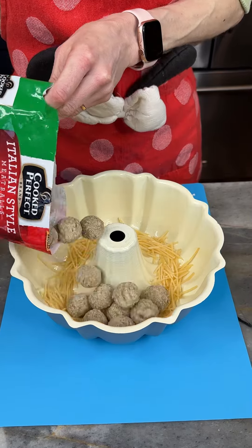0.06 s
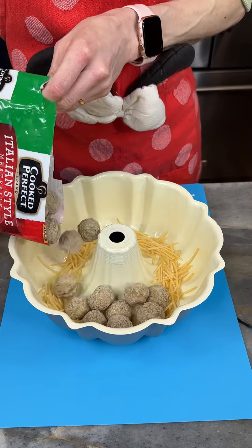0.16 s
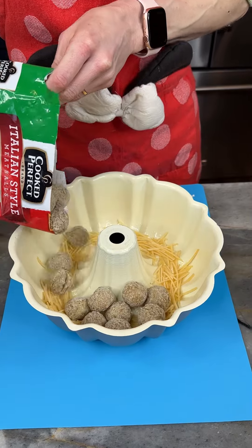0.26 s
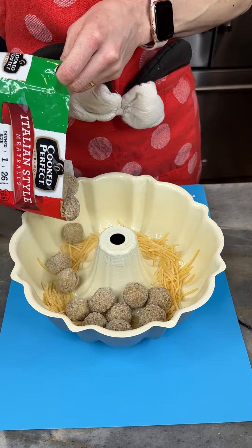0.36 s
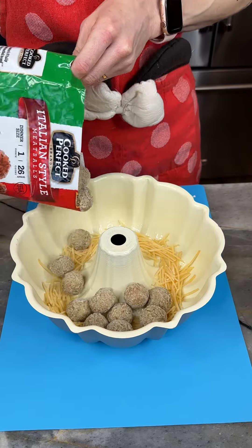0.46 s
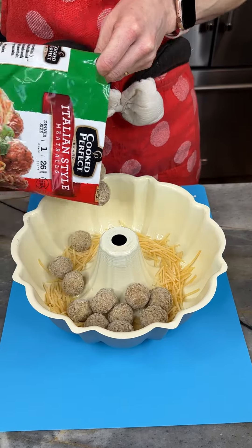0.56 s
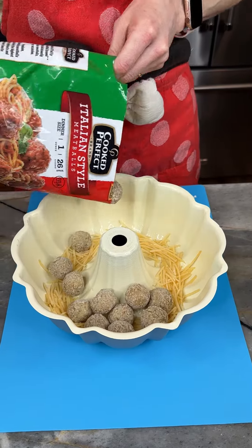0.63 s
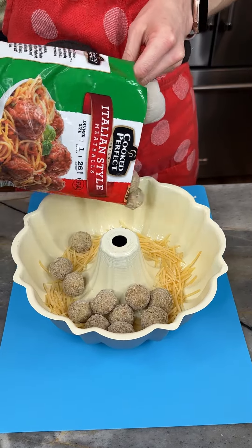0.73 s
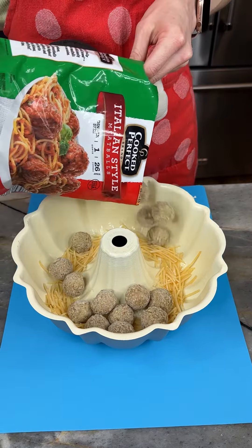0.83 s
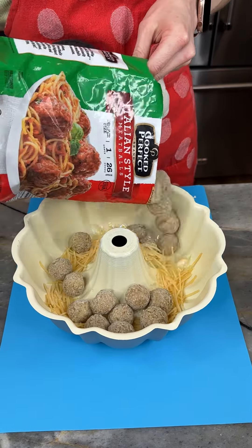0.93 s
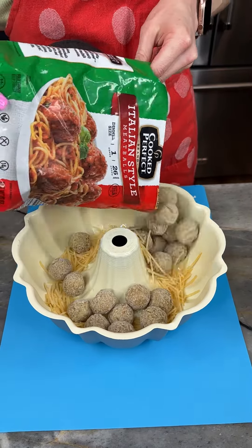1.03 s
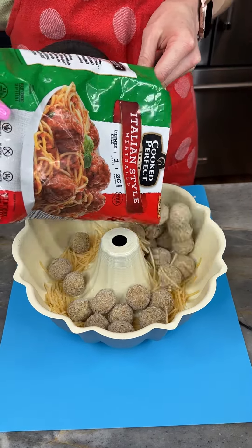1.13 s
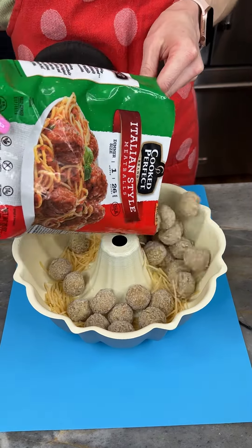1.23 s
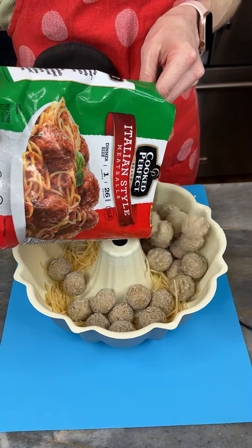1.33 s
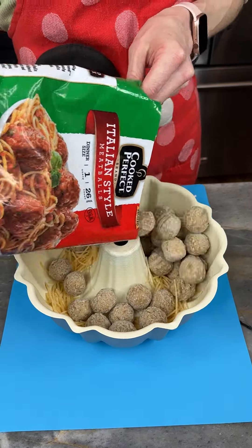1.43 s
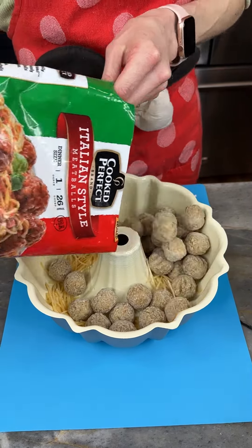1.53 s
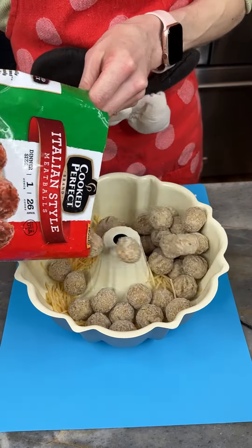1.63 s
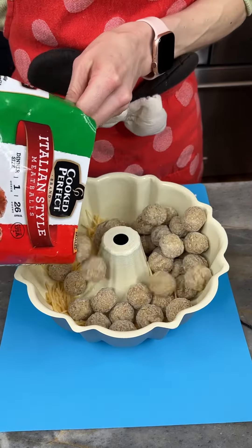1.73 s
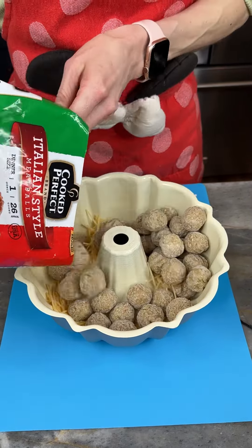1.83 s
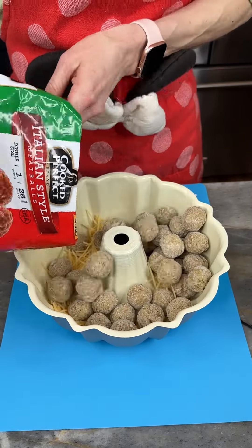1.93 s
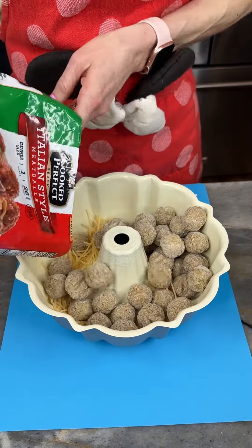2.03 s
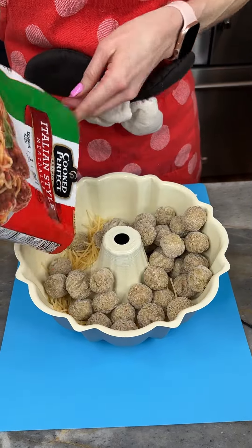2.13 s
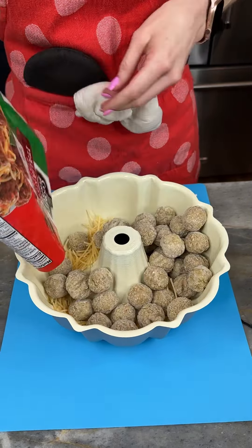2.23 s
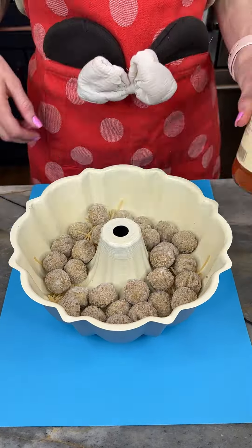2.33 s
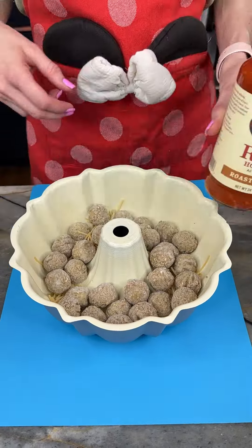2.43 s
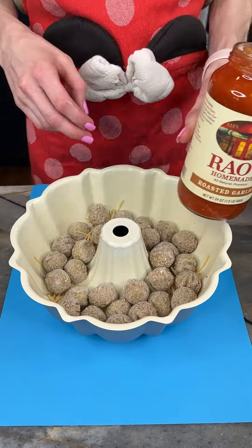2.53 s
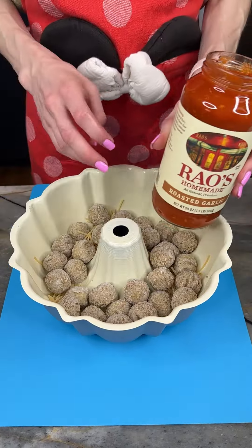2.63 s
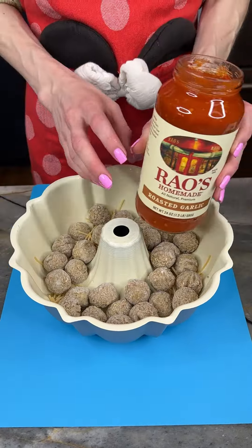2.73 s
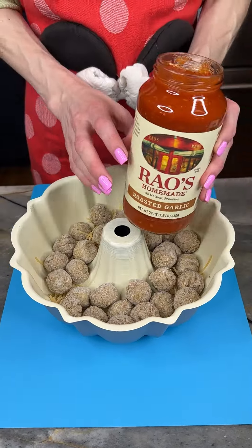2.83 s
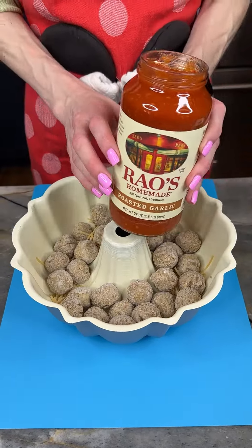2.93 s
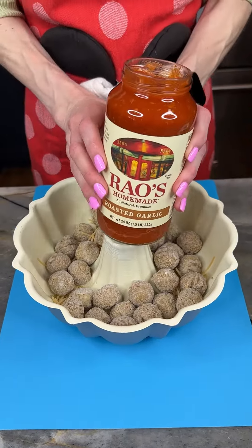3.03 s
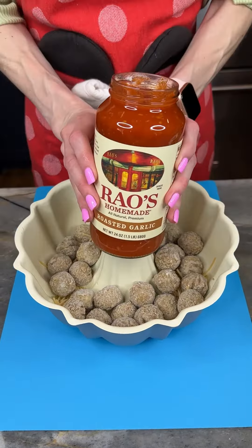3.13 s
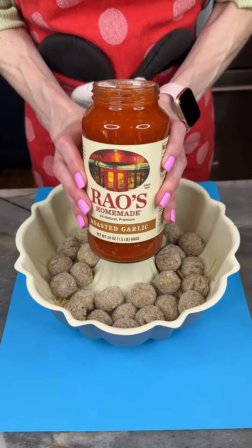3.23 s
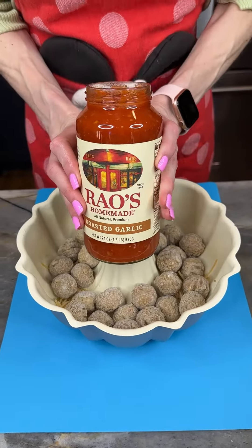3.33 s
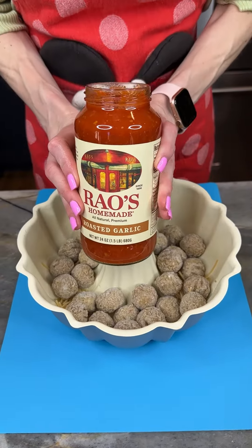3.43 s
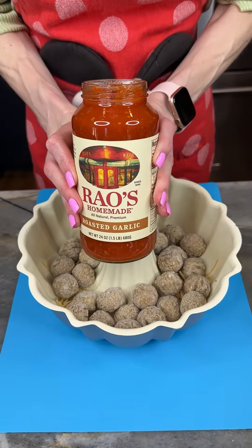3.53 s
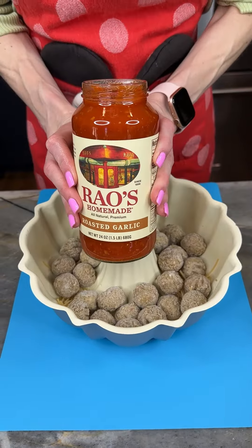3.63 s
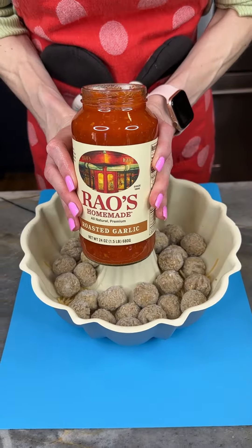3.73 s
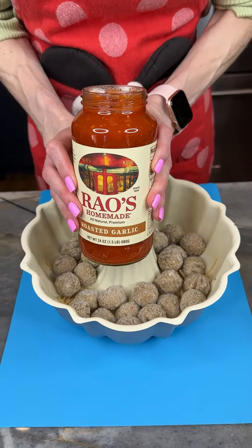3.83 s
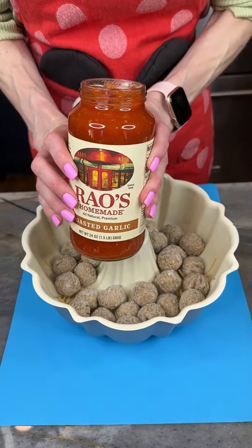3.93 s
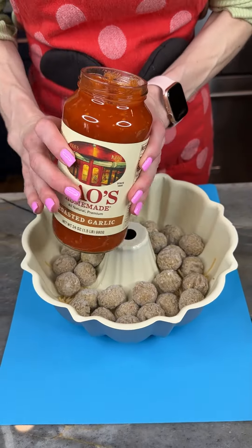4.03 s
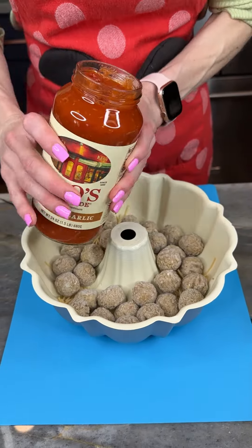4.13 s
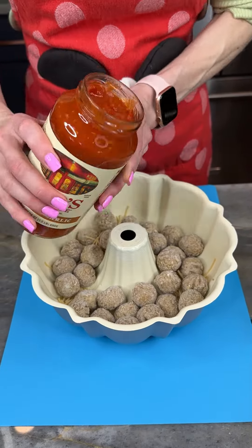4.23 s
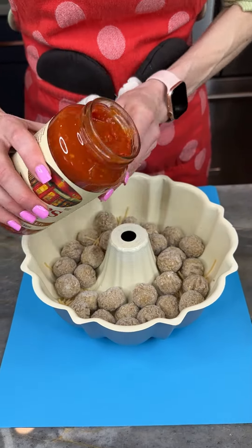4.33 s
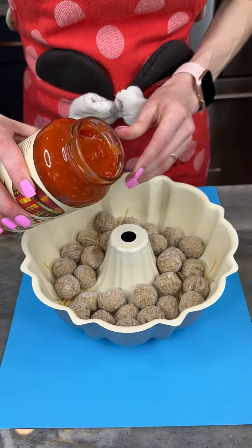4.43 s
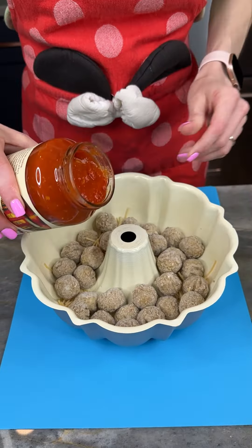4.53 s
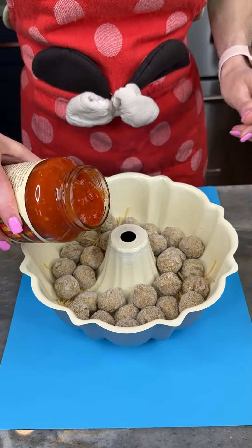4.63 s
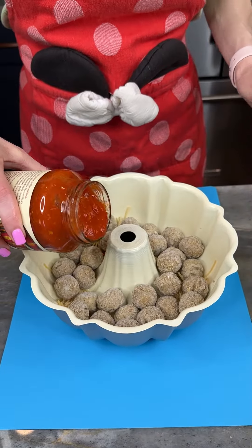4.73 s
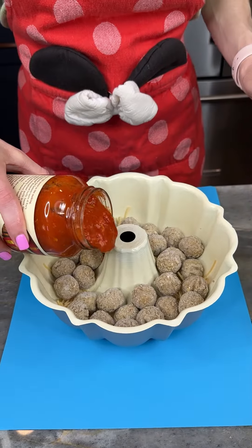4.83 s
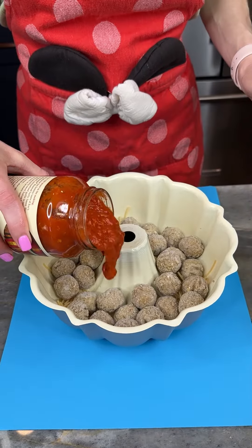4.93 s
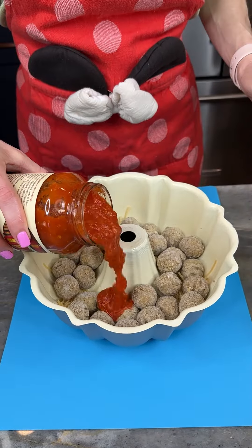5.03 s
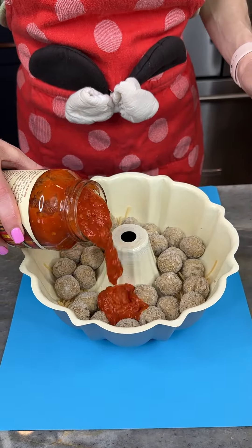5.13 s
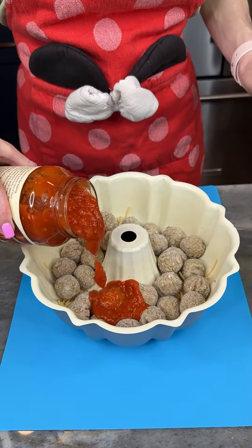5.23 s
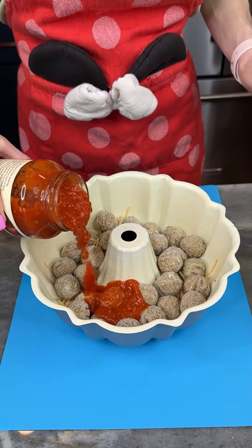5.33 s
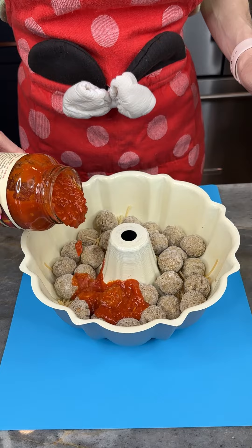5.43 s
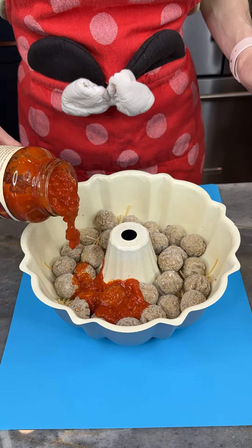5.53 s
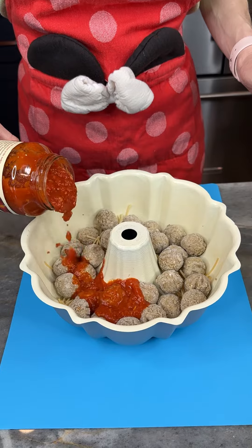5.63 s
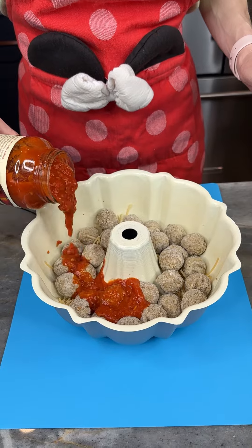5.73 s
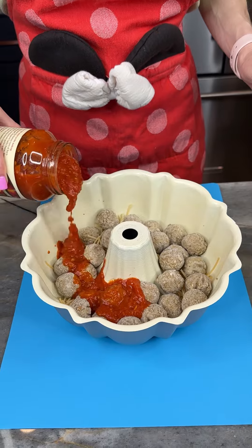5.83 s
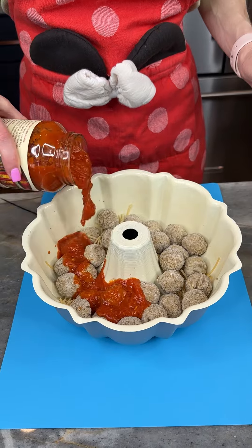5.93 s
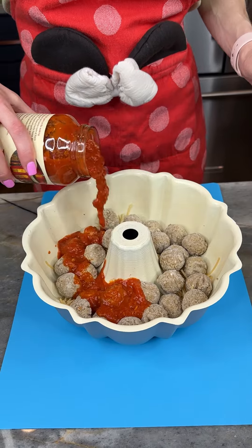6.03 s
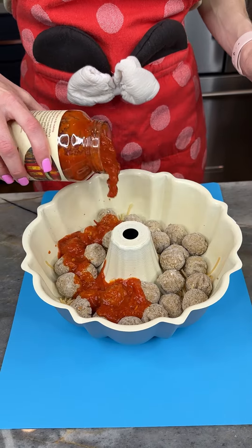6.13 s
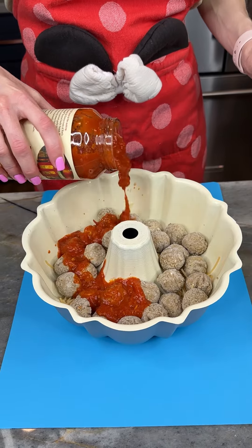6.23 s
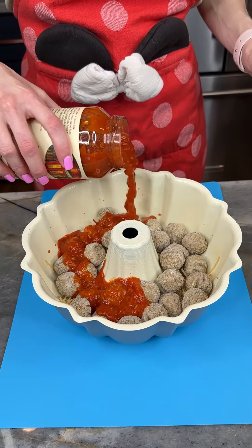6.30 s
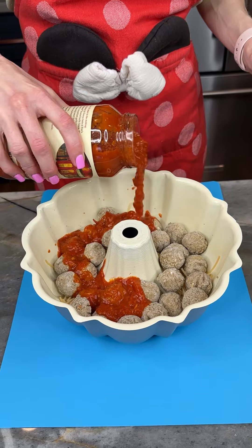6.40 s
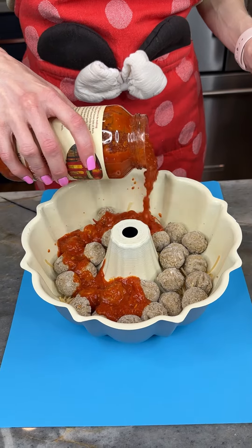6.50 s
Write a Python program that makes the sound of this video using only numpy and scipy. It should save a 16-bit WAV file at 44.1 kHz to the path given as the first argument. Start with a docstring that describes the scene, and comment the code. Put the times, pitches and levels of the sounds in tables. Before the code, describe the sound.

Frozen meatballs clatter from a crackling plastic bag into a ringing pan, then a glass jar clacks and thick sauce plops in a humming kitchen.

```python
"""A kitchen with a refrigerator humming, heard close up through a pair of microphone ports.
Frozen meatballs tumble from a crackling plastic bag: noisy knocks set a fluted pan and its counter ringing.
The level sinks, near sounds stop briefly, a dull tap follows; cloth stirs as faint swells of noise.
A glass jar bumps the pan with clacks and ringing modes, then thick sauce plops down as short rings
with wet ticks, and late among the plops a fine spatter of tiny clicks sets in."""
import sys
import numpy as np
from scipy import signal
from scipy.fft import rfft, irfft
from scipy.io import wavfile

SR = 44100
rng = np.random.default_rng(int(sys.argv[2]) if len(sys.argv) > 2 else 0)


def digitize_waveform(pressure):
    """Quantize a signal to 16-bit integers and store it at the path in sys.argv[1].

    Rows of a 2-D input are taken as channels; values are limited to [-1, 1].
    """
    field = np.atleast_2d(pressure).T
    bounded = np.clip(field, -1, 1)
    quanta = np.round(bounded * 32767).astype(np.int16)
    wavfile.write(sys.argv[1], SR, quanta)


N = 289376


def from_db(db):
    """Amplitude factor of a level in dB."""
    return 10 ** (np.asarray(db) / 20)


def rms_one(x):
    """Scale to an rms of 1."""
    return x / np.sqrt(np.mean(x ** 2) + 1e-20)


def in_time(rows):
    """Level columns at every sample; silent outside the table."""
    s, *columns = np.transpose(rows)
    return [np.interp(np.arange(N) / SR, s, c, left=-150, right=-150) for c in columns]


def at_hz(points, hz):
    """Read a curve of (hz, value) points along a logarithmic pitch axis."""
    point_hz, values = np.array(points).T[:2]
    return np.interp(np.log(hz), np.log(point_hz), values)


def drift(rate_hz):
    """Slow random wander of spread 1: noise through a double low-pass, made at one point per 40 samples."""
    r = np.exp(-80 * np.pi * rate_hz / SR)
    noise = rng.standard_normal(N // 40 + 2002)
    slow = signal.lfilter([1], [1, -2 * r, r * r], noise)[2000:]   # drop the filter's start
    return np.interp(np.arange(N) / 40, np.arange(len(slow)), rms_one(slow))


def above(x, hz):
    """Keep what lies above a pitch."""
    return signal.sosfilt(signal.butter(4, hz, "high", fs=SR, output="sos"), x)


def band_pass(low, high):
    """Filter sections that pass the band between two pitches."""
    return signal.butter(2, [low, high], "band", fs=SR, output="sos")


def ring(clicks, hz, t60):
    """A struck mode: a unit click sets off a sine of height 1 that dies by 60 dB in t60 seconds."""
    r = from_db(-60 / (t60 * SR))
    w = 2 * np.pi * min(hz, .45 * SR) / SR
    return signal.lfilter([0, np.sin(w)], [1, -2 * r * np.cos(w), r * r], clicks + 1e-18, axis=-1)


def dying(count, t60):
    """White noise that rises quickly and fades by 60 dB in t60 seconds."""
    t = np.arange(count) / SR
    return rng.standard_normal(count) * np.minimum(t / (0.13 * t60), 1) * from_db(-60 * t / t60)


def burst(count, hz, cycles, rough):
    """A tick: a dying ring around a pitch, partly broken into noise; peak 1."""
    t60 = max(cycles, 1) / hz
    kick = rough * rng.standard_normal(count) * from_db(-60 * np.arange(count) / SR / t60)
    kick[0] += 1
    ringing = ring(ring(kick, hz, t60), hz, t60 / 2)
    tick = np.diff(ringing, prepend=0)
    return tick / np.abs(tick).max()


def grains(per_s, spread_db):
    """Random clicks of uneven size and either sign; rms 1."""
    sizes = from_db(spread_db * np.minimum(rng.exponential(1, N), 5)) * rng.choice([-1, 1], N)
    return rms_one(sizes * (rng.random(N) < per_s / SR))


def coloured(sources, spectrum, likeness, patchy_db):
    """Half-octave bands of two (mid, side) sources taken in turn, each flickering on its own; rms 1."""
    out, edges = 0, 22 * 2 ** np.arange(0, 10, .5)
    for k, (low, high) in enumerate(zip(edges, edges[1:])):
        hz = np.sqrt(low * high)
        if hz < spectrum[0][0]:
            continue
        mid, side = signal.sosfilt(band_pass(low, high), sources[k % 2])
        alike = np.clip(at_hz(likeness, hz), -1, 1)   # 1: both sides the same, -1: opposite
        gain = from_db(at_hz(spectrum, hz) + patchy_db * drift(49))
        out = out + gain * (np.sqrt(1 + alike) * mid + np.sqrt(1 - alike) * side * [[1], [-1]])
    return rms_one(out)


def sides(left_db):
    """Left and right factors for a left-over-right level difference."""
    return from_db(np.array([left_db, -left_db]) / 2)


def add(out, s, sound):
    """Mix a (channels, samples) sound in at a time in seconds."""
    at = round(s * SR)
    out[:, at:at + sound.shape[1]] += sound[:, :N - at]


def fridge():
    """Two motor hums slightly apart beat slowly; steadier tones lie above, over the rumble of room air."""
    # steady tones: hz, level_db (rms, before a slow wander)
    hum = [(234, -65), (361, -76.5), (605, -83)]
    # relative spectrum of the room air: hz, level_db (per Hz)
    air_colour = [(20, -21.5), (38, -9), (60, -3), (90, -1.5), (140, -6), (200, -5.5), (300, -11.5),
                  (450, -13), (620, -20), (800, -30), (2000, -36.5), (5000, -42), (8500, -39), (11000, -57),
                  (16000, -65)]
    # left-right likeness of the room air: hz, likeness (-1 to 1)
    air_likeness = [(60, 1), (180, 0.72), (550, -0.2), (1650, 0.98), (5000, .3), (15000, -.5)]
    beat_hz, beat_per_s, dip_s = 119.4, 1.9, 2.96   # near dip_s the two hums partly cancel
    lower_db, upper_over_lower_db, air_db = -63, 2.5, -62   # rms
    t = np.arange(N) / SR - dip_s
    lower = np.sin(2 * np.pi * beat_hz * t)
    upper = np.sin(2 * np.pi * (beat_hz + beat_per_s) * t + 0.14 * drift(.8))
    tones = from_db(lower_db) * (lower - from_db(upper_over_lower_db) * upper)
    for tone_hz, level_db in hum:
        level = from_db(level_db + 1.5 * drift(4.2))
        tones = tones + level * np.sin(2 * np.pi * tone_hz * t + .4 * drift(0.75))
    air = coloured(rng.standard_normal((2, 2, N)), air_colour, air_likeness, patchy_db=-0.2)
    return np.sqrt(2) * tones + from_db(air_db) * air   # sqrt(2) turns sine height into rms


def kitchen(x):
    """Dense echoes from hard walls: noise that swells in quickly and dies band by band; two answers."""
    # decay of the nearer echoes: hz, t60_s
    kitchen_t60 = [(400, 0.75), (1000, 0.33), (2500, 0.21), (6000, 0.17), (12000, 0.26)]
    swell_s = 0.0081
    late_db, late_slower = -10.5, 1.7   # a weaker, slower tail from the far end of the room
    t = np.arange(round(.8 * SR)) / SR
    answer, edges = 0, 300 * 2 ** np.arange(0, 6.5)
    for low, high in zip(edges, edges[1:]):
        band = signal.sosfilt(band_pass(low, high), rng.standard_normal((2, len(t))))
        fall_db = -60 * t / at_hz(kitchen_t60, np.sqrt(low * high))
        answer = answer + band * (from_db(fall_db) + from_db(late_db + fall_db / late_slower))
    answer = answer * np.clip(t / swell_s, 0, 1) ** 2
    answer = answer / np.sqrt(np.sum(answer ** 2, 1, keepdims=True))   # unit energy
    return signal.fftconvolve(x[None], answer, axes=1)[:, :N]


def cloth():
    """Soft rustle of cloth and hands: coloured noise that swells and fades in bell shapes."""
    # faint swells: middle_s, half_width_s, level_db (rms at the middle, ahead of the ports)
    swell_rows = [(3.06, .05, -74.5), (3.9, .04, -77), (4.0, 0.047, -71.5), (4.24, .09, -74.5),
                  (4.38, .03, -72)]
    # relative spectrum: hz, level_db (per Hz)
    cloth_colour = [(1000, -23.5), (2500, -2), (5000, -7), (8500, -3), (11000, 0), (15000, -2),
                    (17000, -10)]
    t = np.arange(N) / SR
    swells = sum(from_db(db) * np.exp(-((t - s) / width) ** 2) for s, width, db in swell_rows)
    noise = rng.standard_normal((2, 2, N))
    return swells * coloured(noise, cloth_colour, [(1000, 0.55), (16000, 0.77)], patchy_db=1.5)


def tap():
    """A hand takes the jar off the counter: a dull dry click of short ring and low-passed noise."""
    tap_s, tap_db, tap_hz = 2.491, -41, 580
    out = np.zeros((1, N))
    dull = signal.lfilter([.3], [1, -1.3, .45], dying(count=900, t60=0.018))
    click = .5 * burst(900, tap_hz, cycles=8.4, rough=0.28) + 3.28 * dull
    add(out, tap_s, from_db(tap_db) * above(click, 250)[None])
    return out


def spatter():
    """Tiny droplets bursting on the sauce: fine random clicks that set in late among the plops and grow fainter."""
    # relative spectrum: hz, level_db (per Hz)
    spatter_colour = [(900, 0), (2500, 4), (5000, -9), (9000, -8), (16000, -4)]
    spatter_start_s, rise_s, start_db, sag_db_per_s = 6.1, 0.062, -72.5, 15
    drops = np.array([[grains(600, spread_db=3.5), rng.standard_normal(N)] for k in range(2)])
    t = np.arange(N) / SR - spatter_start_s
    level = np.clip(t / rise_s, 0, 1) * from_db(start_db - sag_db_per_s * t)
    return level * coloured(drops, spatter_colour, [(1000, 0.19), (16000, 0.39)], patchy_db=-0.5)


def counter(times, push_db, tilt_db):
    """The counter under the pan thuds in low modes; tilt (dB per octave) sets the balance of the modes."""
    # counter modes: hz, level_db (relative), t60_s
    counter_modes = [(64.7, -7.5, 0.15), (128, 1.5, 0.08), (151, -11.5, .3), (171.74, -7.5, 0.3),
                     (260, -1.5, 0.03), (400, -11, 0.095)]
    push, out = np.zeros(N), 0
    push[np.round(times * SR).astype(int)] = from_db(push_db)
    for k, (hz, level_db, t60) in enumerate(counter_modes):
        gain = from_db(level_db - 13.5 + tilt_db * np.log2(hz / 124))
        out = out + gain * ring(push, hz, t60) * (-1) ** k   # modes alternate in sign
    return out


def jar():
    """Glass clacks on the pan and both ring as dying modes, the counter thuds."""
    # bumps against the pan: start_s, level_db (relative), thud_db (against that level)
    bumps = [(3.26, -52, -3), (3.267, -29, -15), (3.275, -18.5, -4.5), (3.290, -56.5, 28.5),
             (3.299, -53.5, 4.5), (3.331, -35.5, 9.5), (3.347, -44.5, 13.5)]
    # modes of the jar on the pan: hz, level_db (relative), t60_s
    jar_modes = [(547, -1.5, 0.043), (604, -7.5, 0.13), (677, 3, 0.029), (810, -1, 0.039),
                 (941, 2.5, 0.033), (2060, -1.5, 0.018), (2300, -17, 0.16), (2390, -14, 0.042),
                 (4600, -29, 0.1), (4990, -18, 0.06), (5390, -14, 0.096), (5470, -15.5, 0.13),
                 (5576, -4, 0.063), (7110, -35, 0.16), (7120, -16.5, 0.19)]
    rows = np.array(bumps)
    clicks, clack = np.zeros(N), np.zeros((1, N))
    clicks[np.round(rows[:, 0] * SR).astype(int)] = from_db(rows[:, 1])
    for s, level_db, thud_db in bumps:   # less thud, more clack
        add(clack, s, from_db(level_db - 22.0 - thud_db) * dying(count=2000, t60=0.022)[None])
    glass = signal.lfilter([.6], [1, -.4], clack[0])
    for k, (hz, level_db, t60) in enumerate(jar_modes):
        glass = glass + from_db(level_db - 16.5) * ring(clicks, hz, t60) * (-1) ** k
    return above(glass, 340) + counter(rows[:, 0], rows[:, 1] + rows[:, 2], tilt_db=-8.0)


def sauce():
    """Each lump closes a pocket of air that rings a few cycles; a wet tick of noise starts with the ring."""
    # plops and ticks: start_s, level_db (peak of the ring alone, before panning and the ports),
    # pitch_hz, ring_cycles, tick_db (wet tick noise against the ring)
    plops = [(5.003, -60, 2494, 12, 3), (5.0779, -58, 2510, 9.7, 10.5), (5.1128, -66.5, 4640, 10, 18),
             (5.13, -38.5, 2450, 3.4, 1), (5.2011, -25.5, 890, 7.2, -12), (5.2996, -37.5, 2590, 30, -7),
             (5.3282, -47, 9600, 9, -12), (5.3775, -57.5, 2490, 7.9, 14), (5.391, -41, 10500, 12, -7),
             (5.4191, -38, 2960, 8.6, -.5), (5.4454, -29.5, 9980, 10.7, -15), (5.598, -54, 3820, 12, 9),
             (5.6723, -29.5, 1876, 17, -3.5), (5.881, -26.5, 3590, 3.7, -10.5),
             (5.9503, -60, 4390, 8.4, 13.5), (5.994, -57.5, 1760, 10, 7.5), (6.032, -55, 3900, 17, -18),
             (6.1015, -45, 10100, 9.4, -16), (6.1268, -52, 9500, 9, -13), (6.1417, -61, 7000, 8.1, -8),
             (6.2231, -21, 7950, 7.9, -10.5), (6.3625, -62, 7020, 12, -14), (6.515, -69, 1460, 12, 6)]
    left_at_1k_db, left_db_per_octave = 9.5, -4.5   # deeper plops sound further left
    out = np.zeros((2, N))
    for s, level_db, hz, cycles, tick_db in plops:
        tick = above(dying(count=1300, t60=0.0173), 790)
        plop = burst(1300, hz, cycles, rough=0.083) + from_db(tick_db) * tick
        left_db = left_at_1k_db + left_db_per_octave * np.log2(hz / 1000)
        add(out, s, from_db(level_db) * sides(left_db)[:, None] * plop)
    return out


def bag(rustle_db):
    """Stiff plastic: dense tiny creases as coloured clicks, and single sharp snaps of ring and noise."""
    # creases snapping: start_s, level_db (relative)
    snaps = [(0.0154, -34.5), (0.0568, -35), (0.1795, -26), (0.2354, -22.5), (0.3511, -33), (0.4389, -41),
             (0.6489, -42), (0.6784, -42), (0.6988, -31), (0.7317, -35), (0.7682, -37), (0.7996, -35.5),
             (0.8265, -20.5), (0.8709, -7), (0.9178, -7.5), (0.9797, -16.5), (1.0086, -10.5), (1.0415, -8),
             (1.0575, -15.5), (1.0795, -23.5), (1.1129, -5), (1.2326, -22), (1.2471, -20.5),
             (1.3578, -27.5), (1.4386, -25), (1.4905, -31.5), (1.5404, -21.5), (1.5668, -28),
             (1.6167, -31.5), (1.6796, -29), (1.725, -45), (1.749, -16.5), (1.7579, -8), (1.8911, -18.5),
             (1.945, -32), (1.9654, -20.5), (1.9974, -26), (2.0642, -31), (2.1026, -28), (2.173, -43)]
    # relative spectrum of the rustle: hz, level_db (per Hz)
    rustle_colour = [(900, 3), (1500, -6.5), (2800, -1), (4800, -10), (6500, -9.5), (10500, -14),
                     (13000, -30), (15500, -13.5), (17000, -30)]
    snap_hz, snap_spread = 6200, 0.064   # pitch, and its spread as a share
    creases = np.array([[grains(1500, spread_db=-2.5), rng.standard_normal(N)] for k in range(2)])
    rustle = coloured(creases, rustle_colour, [(1000, 0.27), (16000, 0.87)], patchy_db=5.0)
    out = from_db(rustle_db) * rustle
    for s, level_db in snaps:
        hz = snap_hz * np.exp(snap_spread * rng.standard_normal())
        tick = 0.66 * burst(900, hz, cycles=29, rough=1.0)
        tick += 0.83 * above(dying(count=1800, t60=.04), 4800)[:900]
        tick += 1.5 * above(dying(count=900, t60=.04), 9500)
        add(out, s, from_db(level_db) * np.tile(tick, (2, 1)))
    return out


def pan(rolling_db):
    """Each blow is a short knock and strikes every mode with its own strength; rolling adds small blows."""
    # meatballs on the pan: start_s, level_db (relative), hardness_db (near 3 kHz against that level),
    # pitch_hz (of the knock)
    blows = [(0.015, -17, -21, 634.5), (0.029, -19.5, -22, 791), (0.055, -8, -4, 693),
             (0.072, -16, -10, 791.4), (0.11, -14.5, -28.5, 779), (0.15, -28, -16, 773),
             (0.181, -19, -13, 776.5), (0.237, -2, -17.5, 718.6), (0.285, -18.5, -27, 764),
             (0.35, -26, -16, 679.6), (0.394, -30, -20, 690), (0.439, -21.5, -9, 781),
             (0.501, -33.5, -23.5, 794), (0.566, -37.5, -16.5, 865.5), (0.648, -35.5, -3.5, 642),
             (0.678, -41, 7, 616.2), (0.699, -27.5, 4.5, 606), (0.734, -34, 2, 986), (0.767, -33.5, 7, 964),
             (0.8, -37, -5, 799.3), (0.828, -6, -17, 703), (0.84, 0, -17, 696.2), (0.872, -9.5, -12, 721.6),
             (0.882, -10.5, -16, 646.3), (0.896, -12.5, -11.5, 624), (0.919, -3, -1.5, 758),
             (0.941, -2.5, -9.5, 655.5), (0.979, -7.5, -2, 635), (1.006, -4, -11.5, 616.5),
             (1.03, -4, -6, 631.7), (1.042, -8, -10.5, 782.2), (1.057, -9, -6, 592.5),
             (1.079, -13.5, -15, 616), (1.112, -22, -3.5, 692), (1.153, -18.5, 1, 850),
             (1.164, -15, 2.5, 661), (1.197, -10, -15, 628.7), (1.228, -15.5, -19.5, 643),
             (1.248, -10, 10.5, 759), (1.324, -21.5, -10.5, 667.7), (1.358, -9, -13, 622),
             (1.402, -21.5, -6.5, 606), (1.439, -9.5, 1, 622.6), (1.496, -24, 2, 622),
             (1.541, -3, -12, 694.2), (1.566, -27, 1, 625.2), (1.616, -1, -9.5, 770),
             (1.681, -5, 3.5, 655.3), (1.758, -21, 11, 691), (1.786, -0.5, -8.5, 712),
             (1.834, -24, -19.5, 762), (1.893, -6.5, -12.5, 740), (1.967, -17.5, -3.5, 670.6),
             (2.001, -24, -27, 620), (2.067, -26, -5, 665), (2.102, -31.5, -15, 683),
             (2.176, -29.5, -12.5, 950)]
    # pan modes: hz, level_db (relative), t60_s
    pan_modes = [(570, -24, 0.047), (606.1, -4, 0.11), (631, -15, 0.22), (710, -12, .1), (719.5, -3, 0.037),
                 (728, 1, 0.092), (786, -3.5, 0.037), (911, -10.5, 0.13), (950, -18, 0.033),
                 (1105, -10.5, .08), (976, -12.5, 0.24), (1239.4, -4.5, 0.038), (1349, -13.5, 0.21),
                 (1558, -11, .07), (1598.4, -4.5, .11), (1700, -12, 0.024), (2110, -6, 0.076),
                 (2284, -12, 0.3), (2394, 0, 0.041), (2735, -2, 0.042), (2820, -6, 0.12),
                 (2986, -6.5, 0.05), (3298, -14, 0.015), (3700, -14.5, 0.088), (5300, -18, 0.098),
                 (6200, -15.5, .04), (7100, -11, 0.19)]
    # pitches at which the colour of a blow is set: hz
    colour_hz = [800, 1500, 3000, 7000]
    # edges of the three crunch bands: hz
    band_edges_hz = [1000, 2000, 3700, 11000]
    mid_db, mid_follows = -1.5, 0.31    # near 1.5 kHz: offset and share of the hardness
    top_db, top_follows = -17.5, 0.27   # near 7 kHz: offset and share of the hardness
    left_db, left_db_per_s, left_spread_db = 5, -0.3, 4   # blows lean left, slightly less with time
    strike_spread_db = 3.5   # how unevenly a blow reaches the modes
    load_db_per_s = 6        # the filling pan drives the counter harder

    rows = np.array(blows)
    start_s, level_db, hard_db, pitch_hz = rows.T
    at = np.round(start_s * SR).astype(int)
    chance = rng.standard_normal((len(rows), len(pan_modes) + 1))
    spread = sides(left_db + left_db_per_s * start_s + left_spread_db * chance[:, -1])
    mid, top = mid_db + mid_follows * hard_db, top_db + top_follows * hard_db
    colour = np.column_stack([0 * hard_db, mid, hard_db, top]) + level_db[:, None]

    ringing = np.zeros((2, N))
    rolling = [from_db(rolling_db - 31.5) * grains(250, spread_db=5.5) for k in range(3)]
    for k, (hz, mode_db, t60) in enumerate(pan_modes):
        small_blows = rolling[k % 3] * from_db(mode_db - 5.6 * np.log2(hz / 700))
        clicks = np.tile(small_blows, (2, 1))
        blow_db = np.array([np.interp(np.log(hz), np.log(colour_hz), c) for c in colour])
        if hz < band_edges_hz[0]:   # the spot struck picks the low mode
            blow_db -= np.minimum(30 * np.abs(np.log2(hz / pitch_hz)), 5)
        clicks[:, at] += spread * from_db(blow_db + mode_db - 13 + strike_spread_db * chance[:, k])
        ringing += ring(clicks, hz, t60) * (-1) ** k

    bands = [band_pass(low, high) for low, high in zip(band_edges_hz, band_edges_hz[1:])]
    for s, levels_db, both, knock_hz in zip(start_s, colour, spread.T, pitch_hz):
        # the wall gives way near the blow for a few cycles; frost and crust crunch above that
        knock = from_db(levels_db[0] - 5.0) * burst(1300, knock_hz, cycles=11.14, rough=.08)
        for band, db, t60 in zip(bands, levels_db[1:], [.022, .018, .016]):
            crunch = signal.sosfilt(band, dying(count=1300, t60=t60))
            knock += from_db(db - 4.5) * crunch / np.abs(crunch).max()
        add(ringing, s, both[:, None] * knock)

    small = np.flatnonzero(rolling[0])
    small_db = 20 * np.log10(np.abs(rolling[0][small]))
    rumble = counter(small / SR, small_db - 9 + load_db_per_s * small / SR, tilt_db=8.0)
    return above(ringing, 360) + counter(start_s, level_db - 24, tilt_db=2.0) + rumble


def ports(x):
    """The two microphone ports hear near sources with a level and phase step that depends on pitch."""
    # level step: hz, left_over_right_db
    port_db = [(60, -2), (130, 1), (290, -2.5), (640, 3), (1410, 1), (2200, -4.5), (3100, 0), (6820, -1)]
    # phase step: hz, left_lead_rad
    port_phase = [(100, 0), (2500, .1), (3200, -.5), (5770, .1), (8000, -1.3), (11300, -2.8),
                  (12800, -3.14), (15300, -3.8), (17000, -3.9)]
    hz = np.maximum(np.arange(N // 2 + 1) * SR / N, 1)
    half = from_db(at_hz(port_db, hz) / 2) * np.exp(.5j * at_hz(port_phase, hz))
    return irfft(rfft(x) * [half, 1 / half], N)


def scene():
    """Near sources and their echo through the ports, and the steady kitchen."""
    # tumbling: start_s, rolling_db (in the pan, relative), rustle_db (of the bag, rms ahead of the ports)
    tumble_rows = [(0.0, -17.5, -33.5), (0.12, -27, -48), (0.3, -28, -48.5), (0.5, -42.5, -64.5),
                   (0.7, -59.5, -59), (0.75, -56, -46.5), (0.86, -40, -37.5), (1.03, -17, -22),
                   (1.1, -23.5, -28), (1.43, -22.5, -37), (1.61, -27, -42), (1.76, -25.5, -40.5),
                   (1.88, -60, -45.5), (2.1, -65, -44.5), (2.3, -47, -64)]
    echo_db, late_echo_extra_db = -13, 2.5   # the echo of tap, jar and sauce is somewhat louder
    silent_from_s, silent_to_s = 2.28, 2.45   # near sounds and their echoes stop here
    rolling_db, rustle_db = in_time(tumble_rows)
    tumble = pan(rolling_db) + bag(rustle_db)
    tap_jar_sauce = tap() + jar() + sauce()
    to_walls = (tumble + from_db(late_echo_extra_db) * tap_jar_sauce).mean(0)
    shared, apart = from_db(echo_db) * kitchen(to_walls)
    echo = np.array([shared + 0.94 * apart, shared - 0.15 * apart])   # close ports share most of the echo
    near = ports(tumble + tap_jar_sauce + echo + cloth() + spatter())
    near[:, round(silent_from_s * SR):round(silent_to_s * SR)] = 0
    return near + fridge()


def record(dry):
    """The level sinks and returns, peaks are rounded, the top is cut."""
    # overall level: start_s, level_db
    fade = [(0, 4), (2.0, -2.5), (2.15, -5), (2.27, -9), (2.285, -12), (2.32, 0), (6.56, 0)]
    cutoff_hz, ceiling = 17400, 1.15
    faded = dry * from_db(in_time(fade)[0])
    rounded = ceiling * np.tanh(faded / ceiling)
    return signal.sosfilt(signal.cheby2(14, 95, cutoff_hz, fs=SR, output="sos"), rounded)


dry = scene()
out = record(dry)
digitize_waveform(out)
```